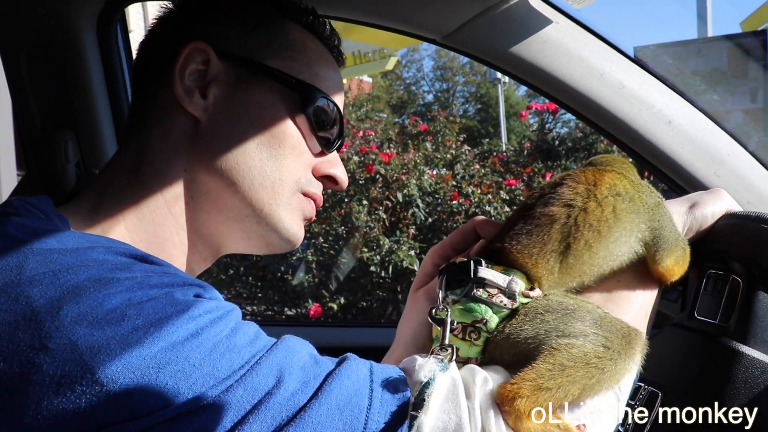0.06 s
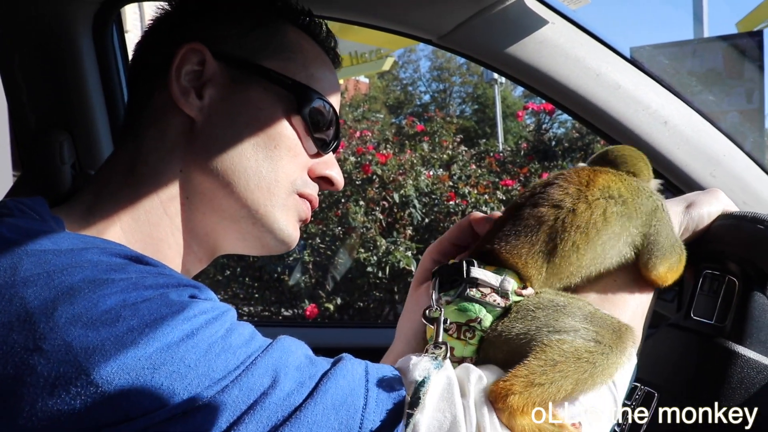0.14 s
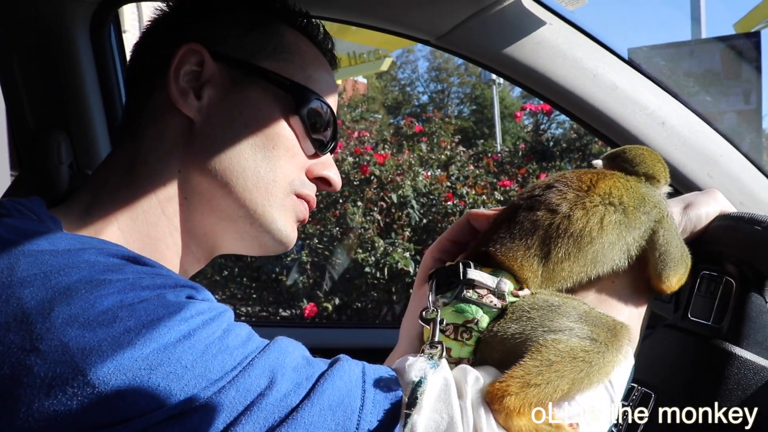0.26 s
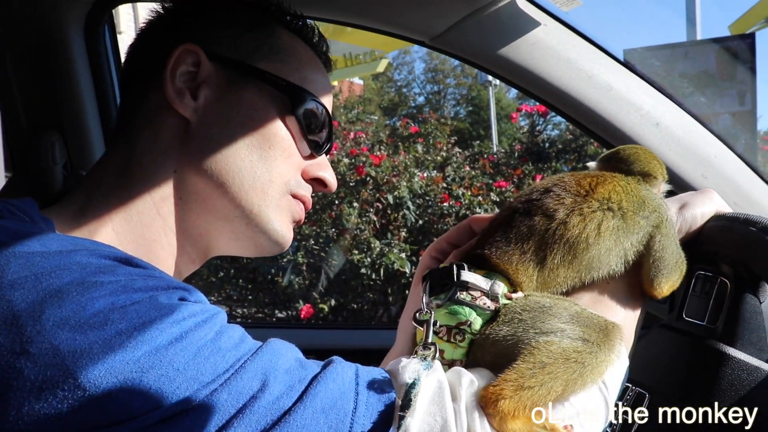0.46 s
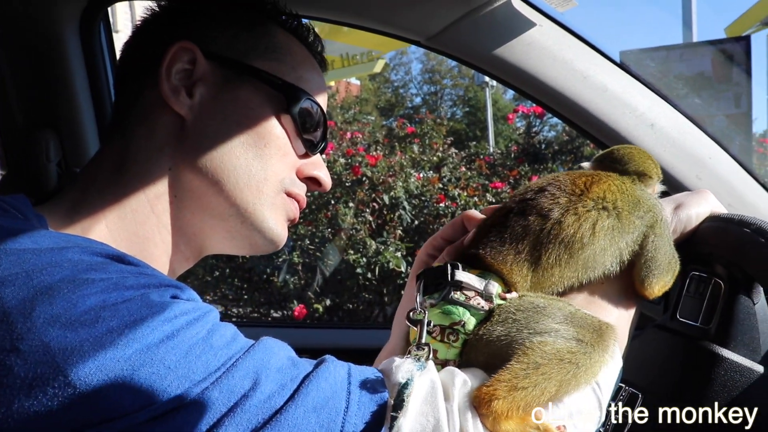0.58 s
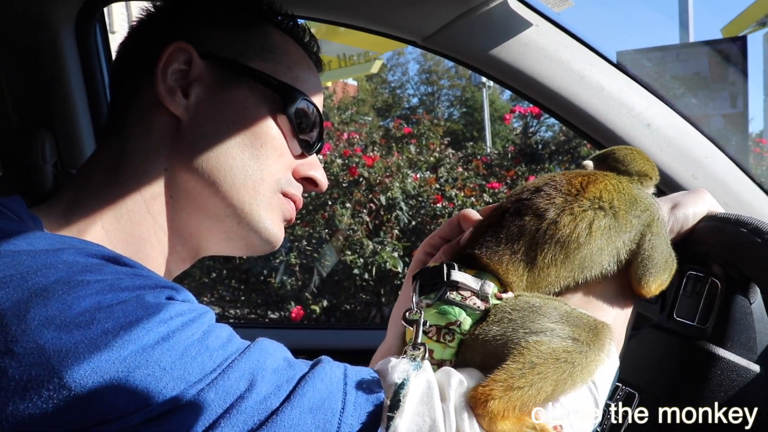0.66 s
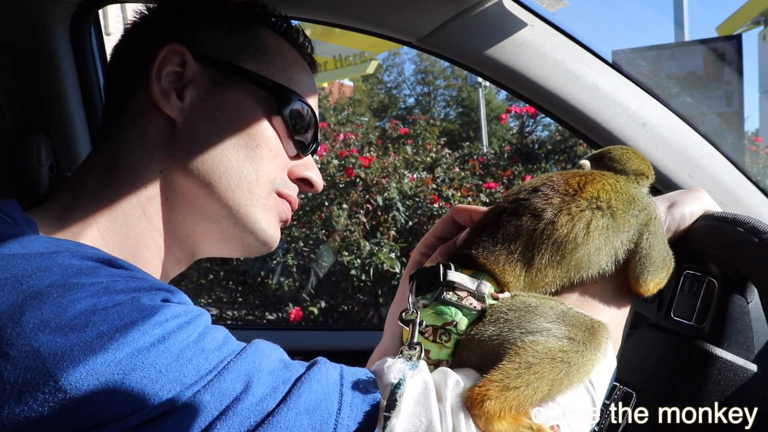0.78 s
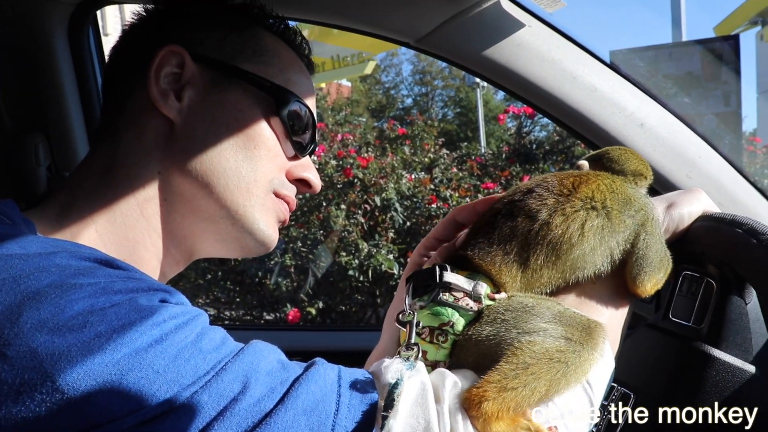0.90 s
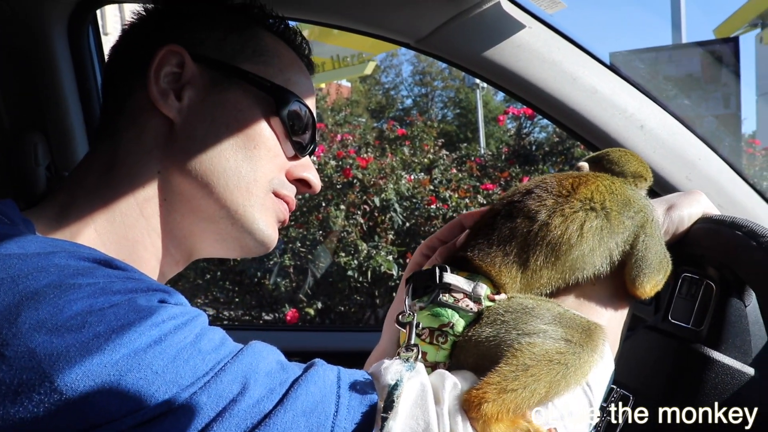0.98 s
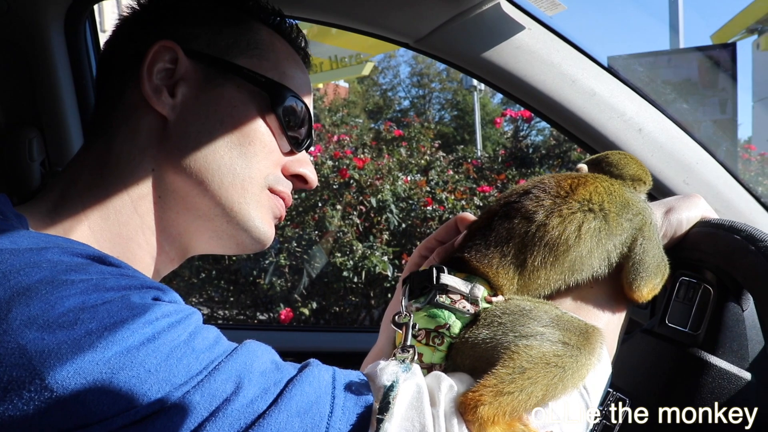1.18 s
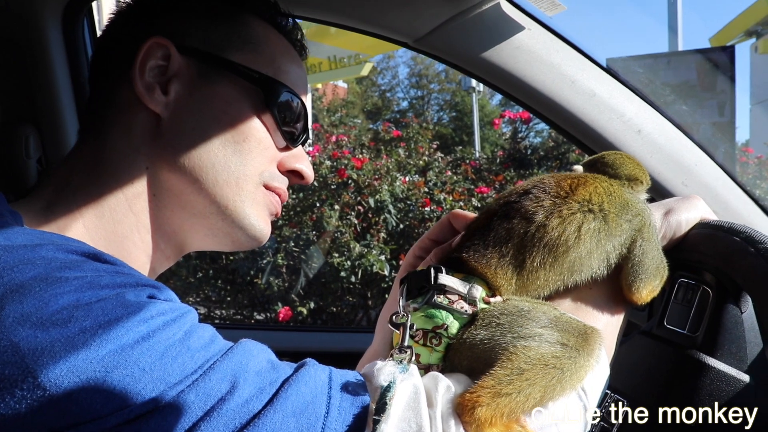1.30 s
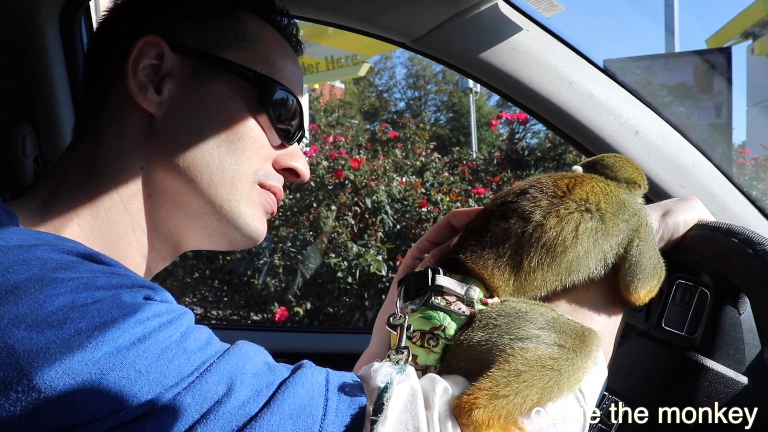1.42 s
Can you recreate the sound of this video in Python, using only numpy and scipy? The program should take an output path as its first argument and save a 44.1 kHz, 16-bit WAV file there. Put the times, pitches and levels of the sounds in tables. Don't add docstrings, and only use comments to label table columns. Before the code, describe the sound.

A small monkey calls close to a stereo microphone in a parked car. Light fur rustling runs from 0 to 0.29 s. At 0.12 s a short squeak rises and turns raspy until 0.17 s. At 0.21 s a loud, piercing, falling peep bursts out with a short cabin reflection; the background dips, then recovers. Low engine idle and hiss continue throughout, with a faint metallic buckle tick at 1.25 s.

```python
import sys
import numpy as np
from scipy import signal
from scipy.fft import rfft, irfft, next_fast_len
from scipy.io import wavfile
from scipy.ndimage import uniform_filter1d, minimum_filter1d, map_coordinates

SR = 44100
rng = np.random.default_rng(int(sys.argv[2]) if len(sys.argv) > 2 else 0)


def waveform_to_disk(signal):
    frames = np.transpose(np.atleast_2d(signal))
    scaled = np.clip(frames, -1, 1) * 32767
    samples = np.round(scaled).astype(np.int16)
    wavfile.write(sys.argv[1], SR, samples)


def to_linear_factor(level_db):
    exponent = np.asarray(level_db, float) / 20
    return 10 ** exponent


N = 63945


def unit(x):
    return x / np.sqrt(np.mean(x ** 2) + 1e-20)


def along(points, hz):
    f, value = np.transpose(points)
    return np.interp(np.log(hz + 1), np.log(f + 1), value)


def curves(rows):
    s, *columns = np.transpose(rows)
    return [np.interp(np.arange(N) / SR, s, column) for column in columns]


def during(rows):
    t = np.arange(N) / SR
    return (t > rows[0][0]) & (t < rows[-1][0])


def wobble(rate_hz):
    knots = rng.standard_normal(int(N * rate_hz / SR) + 4)
    return map_coordinates(knots, [np.arange(N) * rate_hz / SR])


def filtered(x, response):
    size = next_fast_len(N + SR // 2)
    spectrum = rfft(x, size) * response(np.fft.rfftfreq(size, 1 / SR))
    return irfft(spectrum, size)[..., :N]


def panned(pan_db):
    return to_linear_factor(pan_db * np.array([[.5], [-.5]]))


# freq_hz, likeness (1 = identical)
PORT_LIKENESS = [(60, .99), (300, 0.95), (800, 0.87), (1500, .45), (3000, 0.23), (8000, .05)]
# freq_hz, left_over_right_db
PORT_LEAN = [(60, 0), (200, -0.3), (600, -0.5), (2000, -4.5), (5000, -1.5), (12000, -1.5)]


def pair(response):
    def spread(hz):
        angle = np.arccos(np.clip(along(PORT_LIKENESS, hz), -1, 1)) / 2
        return response(hz) * [np.cos(angle), np.sin(angle)]

    mid, side = filtered(rng.standard_normal((2, N)), spread)
    left_right = np.array([mid + side, mid - side])
    return unit(filtered(left_right, lambda hz: panned(along(PORT_LEAN, hz))))


# freq_hz, level_db
THROAT = [(1500, -19.5), (2100, -6), (2900, -2), (3900, -3.5), (6000, 1.5), (8500, -6.5), (10500, -13),
          (13000, -20)]


def stack(hz, dull_db, count):
    k = np.arange(1, count + 1)[:, None]
    flicker_db = 1.5 * np.array([wobble(250) for _ in range(count)])
    gain = to_linear_factor(along(THROAT, k * hz) + dull_db * (k - 3) + flicker_db)
    gain = gain * (k * hz < 14000)
    return (gain * np.sin(2 * np.pi * k * np.cumsum(hz) / SR)).sum(0)


# start_s, pitch_hz, level_db, dulling_db (per harmonic)
SQUEAK = [
    (.1105, 1990, -62, -6),
    (.113, 2000, -51, -8),
    (.117, 1860, -60, -5),
    (.1215, 1775, -50, -2),
    (.124, 1800, -31, -3),
    (.133, 1950, -27.5, -2),
    (.142, 2060, -29.5, -0.5),
    (.148, 2118, -27, 0.5),
    (.151, 2146, -45.5, -4),
]


def clean_squeak():
    hz, db, dull_db = curves(SQUEAK)
    voice = stack(hz * (1 + .004 * wobble(500)), dull_db, count=7)
    return voice * to_linear_factor(db + wobble(300)) * during(SQUEAK)


# start_s, pitch_hz, level_db
RASP = [
    (.148, 3089, -50),
    (.1495, 3076, -28.5),
    (.157, 2903, -29),
    (.164, 2775, -33),
    (.168, 2700, -51.5),
]


def rasp():
    jitter, half_beat, breath_share = .03, .3, .55
    hz, db = curves(RASP)
    hz = hz * (1 + jitter * wobble(900))
    beat = np.cos(np.pi * np.cumsum(hz) / SR)

    def breath_color(f):
        outside = (f < 2400) | (f > 13200)
        return to_linear_factor(along(THROAT, f) - 30 * outside)

    breath = unit(filtered(rng.standard_normal(N), breath_color)) * (1 + beat)
    voice = stack(hz, 0, count=5) * (1 + half_beat * beat)
    mix = (1 - breath_share) * voice + breath_share * breath
    mix = mix * to_linear_factor(db + 3 * wobble(700)) * during(RASP)
    return filtered(mix, lambda f: 1 / (1 + (1900 / (f + 1)) ** 8))


# start_s, pitch_hz, level_db, left_over_right_db
PEEP = [
    (.2085, 10900, -56.5, -8.5),
    (.2125, 10900, -16.5, -1),
    (.215, 10750, -12, 6.5),
    (.2225, 10780, -3, 3),
    (.227, 10500, -7, -11),
    (.237, 9880, -9, -6.5),
    (.245, 9530, -15.5, -10),
    (.249, 9240, -25, -15.5),
    (.253, 9250, -59, -8.5),
]
# freq_hz, level_db (per Hz)
PUFF = [(1000, -16), (4000, -5), (7000, -0.5), (9000, -3), (11800, 5), (13300, 3), (14200, -25.5)]


def peep():
    hz, db, pan_db = curves(PEEP)
    tone = np.sqrt(2) * to_linear_factor(db) * np.sin(2 * np.pi * np.cumsum(hz) / SR) * during(PEEP)
    puff_start_s, puff_len_s, puff_db = .2075, 0.013, -33.5
    u = np.clip((np.arange(N) / SR - puff_start_s) / puff_len_s, 0, 9)
    swell = 4 * u * np.exp(-3 * u)
    puff = to_linear_factor(puff_db) * swell * pair(lambda f: to_linear_factor(along(PUFF, f)))
    return tone, tone * panned(pan_db) + puff


# start_s, level_db
RUSTLE = [
    (0, -56.5),
    (.05, -54.5),
    (.085, -45.5),
    (.115, -55),
    (.2, -53),
    (.235, -75),
    (.255, -53),
    (.27, -58),
    (.29, -68.5),
]
# freq_hz, level_db (per Hz)
FUR = [(800, -31), (2000, 1), (4000, -2.5), (7000, -10), (14000, -18.5)]


def rustle():
    db, = curves(RUSTLE)
    return to_linear_factor(db + 2.5 * wobble(120)) * pair(lambda f: to_linear_factor(along(FUR, f))) * during(RUSTLE)


# start_s, peak_db
TICK = [
    (1.2501, -36),
    (1.2513, -38),
    (1.2552, -45),
]
# freq_hz, level_db, t60_s
BUCKLE = [(5739, -19, 0.0058), (7924, 4, 0.014), (8516, 5.5, 0.01), (13430, -29, 0.086)]


def tick():
    out, t = np.zeros(N + SR), np.arange(SR // 20) / SR
    for start_s, db in TICK:
        ring = sum(to_linear_factor(level - 60 * t / t60) * np.sin(2 * np.pi * hz * t) for hz, level, t60 in BUCKLE)
        crack = .7 * to_linear_factor(-60 * t / 0.00401) * np.diff(rng.standard_normal(len(t) + 1))
        out[round(start_s * SR):][:len(t)] += to_linear_factor(db - 3) * (ring + crack)
    return out[:N]


def cabin(x):
    t60_s, gap_s, level_db, pan_db = .054, .002, -1.5, -3
    t = np.arange(SR // 6) / SR
    tail = rng.standard_normal((2, len(t))) * to_linear_factor(-60 * t / t60_s) * np.clip(t / gap_s, 0, 1)
    tail = tail / np.linalg.norm(tail[0])
    answer = signal.fftconvolve(x[None], tail, axes=1)[:, :N]
    return to_linear_factor(level_db) * panned(pan_db) * answer


# multiple (of the firing rate), level_db (rms)
ORDERS = [(1, -40), (2, -49), (3, -53), (3.5, -55.5), (4, -45.5), (5.5, -59), (6, -58), (7, -54),
          (9, -59.5), (9.5, -55)]
# freq_hz, width_hz, level_db
BODY = [(110, 53, -5), (271, 130, -6.5), (440, 64, -4.5), (538, 70, -1), (599, 41.6, -1.5), (805.7, 74, -7)]
# freq_hz, level_db (per Hz)
HISS = [(20, 2.5), (90, -1), (250, -12), (900, -12), (2500, -19.5), (6000, -28.5), (12000, -33),
        (15700, -42.5)]


def engine():
    firing_hz, firing_gate = 31.304, .12
    boom_db, whine_db, hiss_db = -38.5, -63, -44.5
    whine_hz, whine_width_hz = 1650, 70
    turn = 2 * np.pi * np.cumsum(firing_hz * (1 + .006 * wobble(3))) / SR
    lines = 0
    for k, db in ORDERS:
        level = np.sqrt(2) * to_linear_factor(db + 2.7 * wobble(9.2))
        lines = lines + level * np.sin(k * turn + rng.uniform(0, 2 * np.pi))

    def body(f):
        total = 0
        for k, (center, width, db) in enumerate(BODY):
            mode = 1j * f * width / (center * center - f * f + 1j * f * width)
            total = total + (-1) ** k * to_linear_factor(db) * mode
        return total

    boom = pair(lambda f: body(f) / (1 + (f / 900) ** 4))
    boom = boom * (1 + firing_gate * np.cos(turn)) * to_linear_factor(boom_db + 1.2 * wobble(5.82))
    whine = pair(lambda f: 1 / (1 + ((f - whine_hz) / whine_width_hz) ** 2))
    whine = whine * to_linear_factor(whine_db + 2.5 * wobble(13))
    hiss = to_linear_factor(hiss_db + 0.27 * wobble(4.5)) * pair(lambda f: to_linear_factor(along(HISS, f)))
    return lines * to_linear_factor([[-.4], [.4]]) + boom + whine + hiss


def scene():
    call_lag_s, call_pan_db = 2 / SR, -2.7
    squeak_wet_db, buckle_wet_db = -3, -6
    call, buckle = clean_squeak() + rasp(), tick()
    tone, direct_peep = peep()
    late_left = np.array([np.roll(call, round(call_lag_s * SR)), call])
    direct = late_left * panned(call_pan_db) + direct_peep + buckle
    answer = cabin(to_linear_factor(squeak_wet_db) * call + tone + to_linear_factor(buckle_wet_db) * buckle)
    return direct + answer + rustle() + engine()


def top_cut(x):
    return signal.sosfilt(signal.butter(12, 15750, fs=SR, output="sos"), x)


def record(dry):
    port_lag_s, top_hz = 8 / SR, 15750
    duck_start_s, duck_db, attack_s, hold_s, recover_s = .216, -8.5, 0.0039, 0.021, .11
    ceiling, limit_s = .66, .002
    t = np.arange(N) / SR - duck_start_s
    duck = np.clip(t / attack_s, 0, 1) * np.clip(1 - (t - hold_s) / recover_s, 0, 1)

    def ports(hz):
        delay_s = port_lag_s * np.array([[.5], [-.5]])
        return np.exp(-2j * np.pi * hz * delay_s) * (hz < top_hz)

    x = filtered(dry, ports) * to_linear_factor(duck_db * duck)
    size = round(limit_s * SR)
    need = np.minimum(1, ceiling / (np.abs(x).max(0) + 1e-9))
    gain = uniform_filter1d(minimum_filter1d(need, 2 * size), size)
    return top_cut(x * gain)


dry = scene()
out = record(dry)
waveform_to_disk(out)
```